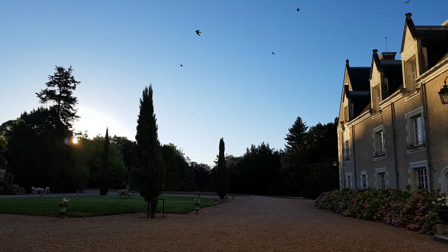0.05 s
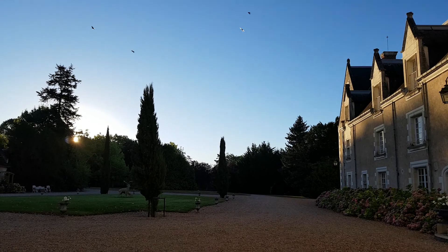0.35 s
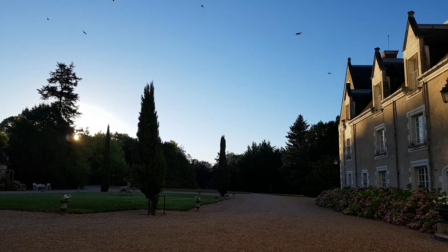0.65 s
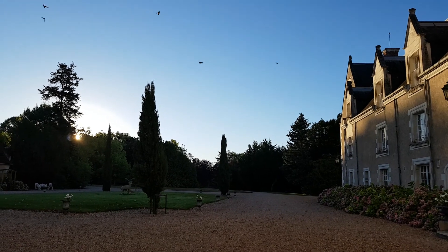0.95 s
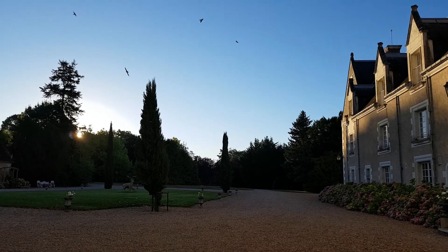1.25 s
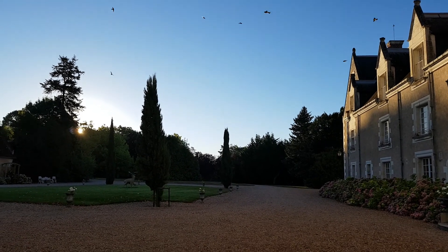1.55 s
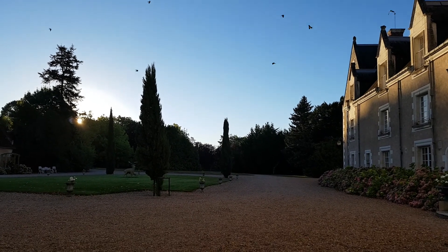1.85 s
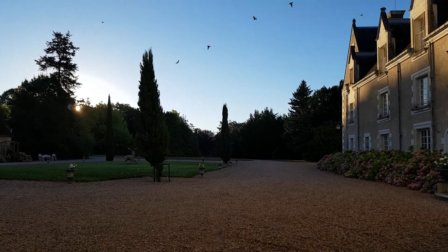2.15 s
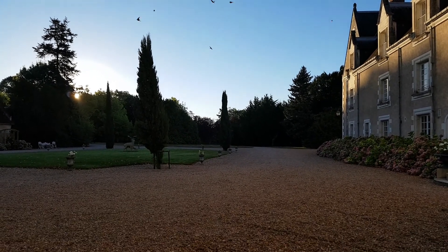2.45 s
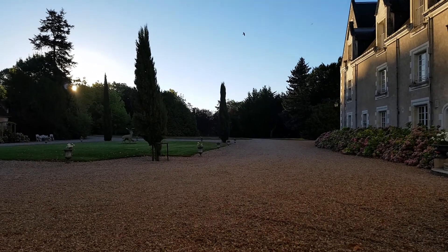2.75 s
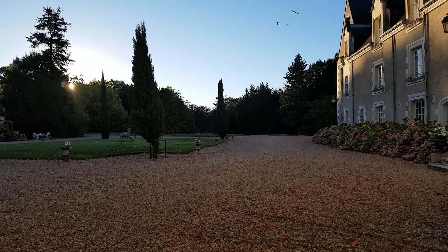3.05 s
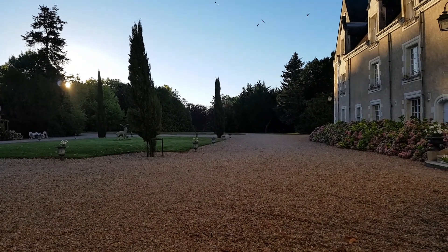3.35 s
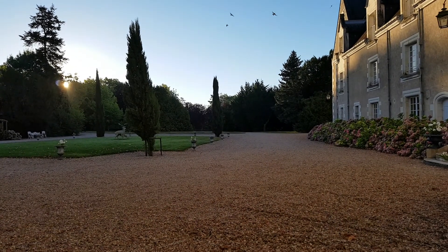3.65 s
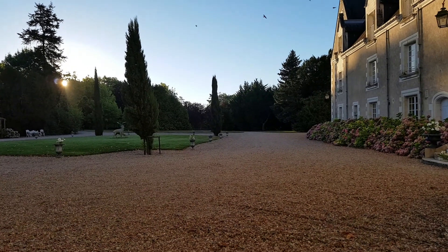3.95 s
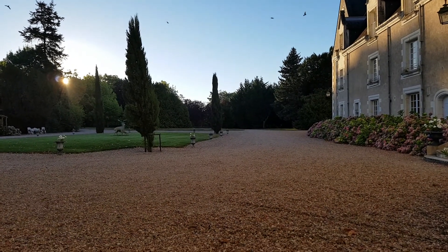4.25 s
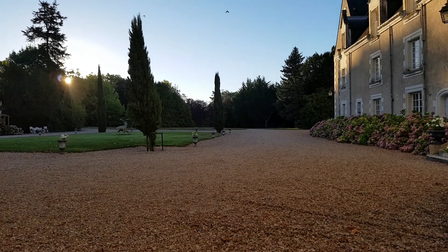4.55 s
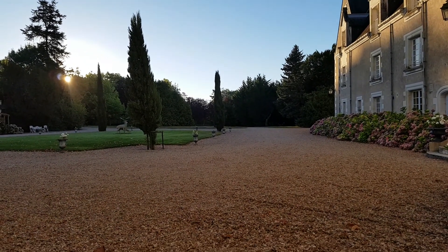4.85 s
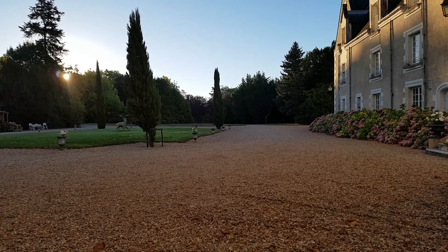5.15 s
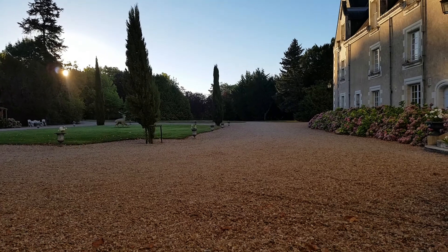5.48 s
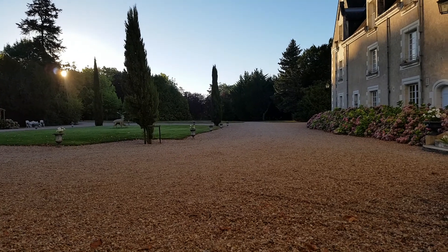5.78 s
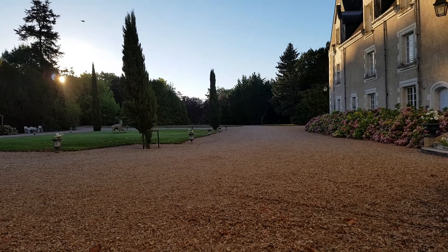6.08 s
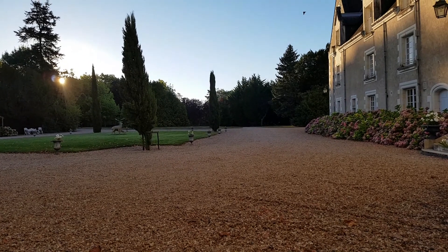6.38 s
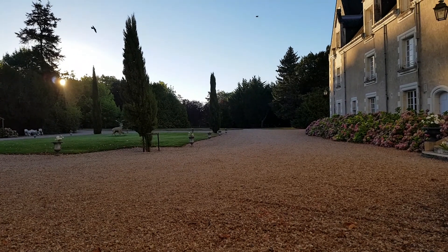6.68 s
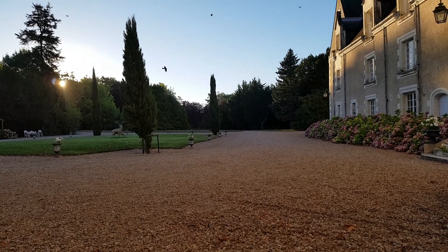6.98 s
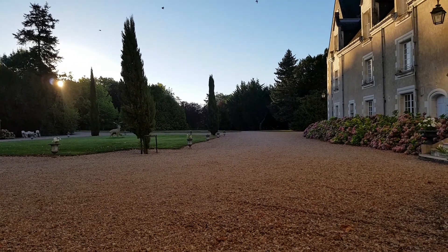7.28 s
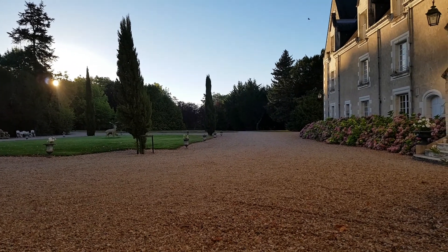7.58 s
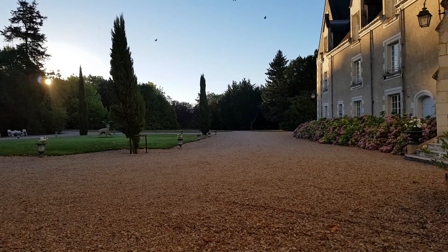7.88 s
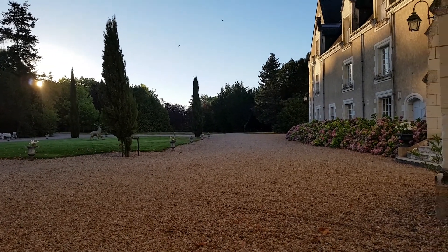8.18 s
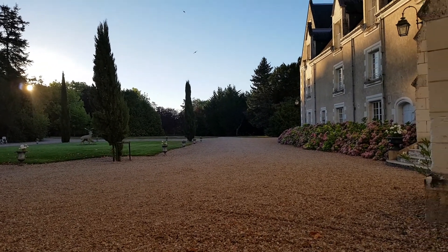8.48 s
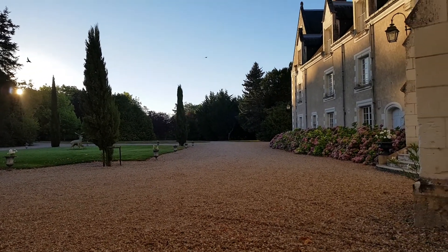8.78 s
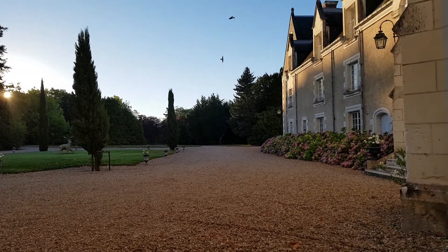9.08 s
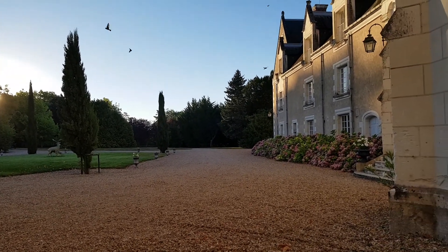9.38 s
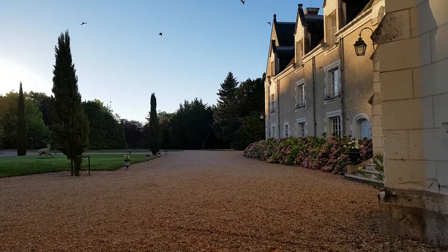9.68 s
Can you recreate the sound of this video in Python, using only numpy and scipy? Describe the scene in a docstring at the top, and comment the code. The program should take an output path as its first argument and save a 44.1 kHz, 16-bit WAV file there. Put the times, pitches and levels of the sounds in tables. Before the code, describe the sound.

High chirps, raspy buzzes and swooping alarm whistles from small birds echo around an open courtyard above a low distant hum.

```python
"""Martins wheel over a gravel court beside a stone house, heard in stereo on a still day.
Close to the microphone they give falling, fluttering alarm whistles, arched chirps, buzzy rasps
made of fast upsweeps and a soft low twitter; further off are thin peeps. The gravel scuffs faintly.
The wall and a far tree line throw the calls back, their echo lingers as a shimmer, and distant
traffic hums underneath."""
import sys
import numpy as np
from scipy import signal
from scipy.fft import rfft, irfft, next_fast_len
from scipy.io import wavfile

SR = 44100
rng = np.random.default_rng(int(sys.argv[2]) if len(sys.argv) > 2 else 0)


def store_wav(level_fs):
    """Save 16-bit WAV to argv[1]."""
    pcm = np.round(np.clip(np.atleast_2d(level_fs), -1, 1) * 32767)
    wavfile.write(sys.argv[1], SR, pcm.T.astype(np.int16))


N = 437913
TIME = np.arange(N) / SR


def from_db(db):
    """Decibels to gain."""
    return 10 ** (np.asarray(db) / 20)


def rms_one(x):
    """Scale to unit power."""
    return x / np.sqrt(np.mean(x ** 2) + 1e-20)


def at_hz(points, hz):
    """Read a spectrum table on a log-frequency axis."""
    table = np.array(points)
    return np.interp(np.log(np.maximum(hz, 1)), np.log(table[:, 0]), table[:, 1])


def noise(spectrum, size=N):
    """Noise of a given colour, unit power."""
    padded = next_fast_len(size)
    colour = from_db(at_hz(spectrum, np.fft.rfftfreq(padded, 1 / SR)))
    return rms_one(irfft(rfft(rng.standard_normal(padded)) * colour, padded)[:size])


def wander(t, per_s):
    """Smooth chance that takes a new value per_s times a second."""
    knots = rng.standard_normal(2048)
    return np.interp((t - t[0]) * per_s, np.arange(len(knots)), knots)


def span(start, length):
    """The sample times of one call."""
    return TIME[int(start * SR):][:max(int(length * SR), 32)]


def fades(t, edge_s):
    """Soft start and end."""
    return np.sin(np.pi / 2 * np.clip(np.minimum(t - t[0], t[-1] - t) / edge_s, 0, 1)) ** 2


def envelope(t, attack_s, release_s=.025):
    """Straight attack, hold, straight release."""
    return np.minimum((t - t[0]) / attack_s, 1) * np.minimum((t[-1] - t) / release_s, 1)


def phase_of(hz):
    """Running phase of a moving pitch."""
    return 2 * np.pi * np.cumsum(hz) / SR


def add(out, t, sound, pan_db, send_db=0, lag_s=0):
    """Place a sound in stereo: out[0] goes straight to the microphone, out[1] to the walls."""
    sides, send = rms_one(from_db([pan_db / 2, -pan_db / 2])), from_db(send_db)
    for channel, at in enumerate([round(t[0] * SR), round((t[0] + lag_s) * SR)]):
        placed = sound * sides[channel] / np.sqrt(1 + send ** 2 / 2)
        out[0, channel, at:at + len(t)] += placed
        out[1, channel, at:at + len(t)] += placed * send


# Distant traffic and open air. Each row: frequency in Hz, relative level in dB.
AIR_SPECTRUM = [(20, -6.5), (35, -8), (50, -0.5), (67, 1.5), (105, -6), (140, -0.5), (180, -4), (300, -12),
                (600, -16), (1500, -20), (3000, -21.5), (7500, -32.5), (10000, -33.5), (15500, -28.5)]
# The background's rise and fall. Each row: time in seconds, level in dB before gain_db.
AIR_LEVEL = [(0.0, -64.5), (4.12, -61.5), (4.17, -63), (9.29, -65), (9.37, -62), (9.93, -65)]
# Its width at the microphone. Each row: frequency in Hz, left-right likeness from 0 to 1.
AIR_LIKENESS = [(30, 0.88), (140, 0.87), (350, 0.44), (700, 0.24), (2000, 0), (8000, 0)]


def open_air(gain_db=2.5, pan_db=-1.5):
    """Far traffic hums almost alike in both channels, under a thin, wide hiss."""
    size = next_fast_len(N)
    hz = np.fft.rfftfreq(size, 1 / SR)
    alike = at_hz(AIR_LIKENESS, hz)
    mid, side = rfft(rng.standard_normal((2, size)))
    pair = np.sqrt(1 + alike) * mid + np.sqrt(1 - alike) * side * [[1], [-1]]
    pair *= from_db(at_hz(AIR_SPECTRUM, hz) + pan_db / 2 * alike * [[1], [-1]])
    level_db = gain_db + np.interp(TIME, *np.transpose(AIR_LEVEL))
    return rms_one(irfft(pair, size)[:, :N]) * from_db(level_db)


# The calls' echo hanging over the court. Each row: time in seconds, centre pitch in Hz, level in dB.
LINGERING_ECHO = [(0, 4450, -68), (.78, 4460, -72.5), (0.952, 4880, -61.5), (1.299, 4240, -66.5),
                  (1.7, 3901, -62.5), (2.25, 4190, -87), (2.5, 4620, -66.5), (4.199, 4485, -64),
                  (4.801, 3644, -71.5), (5.55, 3880, -83.5), (6.099, 3765, -68), (6.45, 3845, -62.5),
                  (6.998, 4740, -66.5), (7.548, 4360, -125), (7.95, 4340, -65.5), (8.5, 4646, -65.5),
                  (9.15, 4228, -87.5), (9.93, 4170, -69)]


def lingering_echo(width_hz=480, flicker_db=2, buzz_db=2, pan_db=-3):
    """The calls ring on in a shimmering band of noise whose pitch drifts."""
    times, hz, db = np.transpose(LINGERING_ECHO)
    lowpass = signal.butter(2, width_hz, fs=SR, output="sos")
    blur = signal.sosfilt(lowpass, rng.standard_normal((2, 2, N)))
    band = np.real((blur[0] + 1j * blur[1]) * np.exp(1j * phase_of(np.interp(TIME, times, hz))))
    level_db = np.interp(TIME, times, db) + flicker_db * wander(TIME, 22) + buzz_db * wander(TIME, 110)
    return rms_one(band * from_db([[pan_db / 2], [-pan_db / 2]])) * from_db(level_db)


# Short buzzy sounds: rasps, and two alarm echoes thrown back from the trees (at 7.091 and 9.817 s).
# Each row: start in seconds, length in seconds, level in dB.
BUZZES = [ (0.138, 0.1, -54), (.227, 0.14, -59.5), (0.41, 0.036, -51), (0.703, .051, -66.5),
          (0.8, 0.091, -53), (2.604, .087, -47.5), (2.715, 0.086, -46.5), (2.868, 0.084, -44.5),
          (2.986, 0.077, -44.5), (3.169, .093, -52.5), (3.293, 0.057, -54.5), (3.475, 0.11, -50.5),
          (3.647, 0.052, -54), (3.805, 0.1, -58.5), (3.914, 0.2, -59), (4.046, 0.051, -49.5),
          (4.185, .13, -64.5), (4.402, 0.25, -57.5), (5.791, 0.13, -65), (5.978, 0.076, -48.5),
          (6.973, 0.054, -62), (7.091, 0.052, -61), (7.89, 0.11, -64.5), (8.057, .1, -61),
          (8.166, 0.11, -50), (8.281, 0.1, -49.5), (8.661, 0.072, -64), (9.817, 0.085, -62), ]
# A far bird repeats a rasp at an even pace. Each row: start and latest repeat in seconds,
# starting pitch in Hz, level in dB, left over right in dB.
FAR_BOUTS = [(4.603, 5.7, 1755, -65.5, -2), (7.354, 7.7, 2204, -70.5, -5)]


def buzzes(from_hz=2440, single_pan_db=-3.5, pace_s=.243, bout_rasp_s=.095):
    """List the single buzzy sounds, then every rasp in the far bouts."""
    calls = [(start, length, from_hz, db, single_pan_db) for start, length, db in BUZZES]
    for start, end, hz, db, pan_db in FAR_BOUTS:
        count = int((end - start) / pace_s) + 1
        calls += [(start + k * pace_s, bout_rasp_s, hz, db, pan_db) for k in range(count)]
    return calls


# How throat and beak pass a rasp's partials. Each row: frequency in Hz, gain in dB.
BEAK_RESPONSE = [(1500, 4.5), (2400, 0), (3300, -2.5), (4100, 0.5), (4700, -2), (5300, 1), (6500, -15.5),
                 (9000, -15), (13000, -19), (16000, -10)]
# The hiss in a rasp. Each row: frequency in Hz, relative level in dB.
RASP_HISS = [(1000, -3.5), (2400, -4), (4700, 11.5), (5500, -9), (6800, -13), (12000, -1), (15000, -11),
             (16000, -30)]


def rasps(sweep_s=.0215, rise_share=.62, top_ratio=2.25, waver=.11, rough=.085, hiss_db=-8,
          swell_db=5, uneven_db=-1.5, ring_hz=4850, near_db=-46):
    """Both sides of the syrinx shoot rough upsweeps through the beak, which rings on.
    The two alarm echoes from the trees get the same buzz."""
    out, hiss = np.zeros((2, 2, N)), noise(RASP_HISS)
    beak_ring = signal.iirpeak(ring_hz, Q=9, fs=SR)
    for start, length, low_hz, db, pan_db in buzzes():
        t = span(start, length)
        age = t - t[0]
        sweeps = age / sweep_s + .1 * wander(t, 45) * np.minimum(age / .02, 1)
        rise = np.minimum(sweeps % 1 / rise_share, 1)
        tone = 0
        for _ in range(2):   # each side wavers on its own
            pitch = low_hz * (1 + (top_ratio - 1) * rise ** 1.4) * (1 + waver * wander(t, 300))
            phase = phase_of(pitch * (1 + rough * wander(t, 2200)))
            for k in range(1, 5):
                gain = from_db(at_hz(BEAK_RESPONSE, k * pitch)) / np.sqrt(k)
                tone += gain * np.sin(k * phase) * (k * pitch < SR / 2)
        pulses = .25 + .75 * np.abs(np.sin(np.pi * rise ** 1.2)) ** .5
        swell = from_db(swell_db * np.sin(np.pi * age / length) + uneven_db * wander(t, 110))
        breath = from_db(hiss_db) * hiss[round(t[0] * SR):][:len(t)]
        voice = (rms_one(tone) + breath) * pulses * swell
        voice += from_db(2) * signal.lfilter(*beak_ring, voice)
        send_db = np.clip(.98 * (near_db - db), 2, 10)   # faint ones are far off, with more echo
        add(out, t, from_db(db) * rms_one(voice * fades(t, .00044)), pan_db, send_db, lag_s=.00003)
    return out


# A whistling throat favours one pitch. Each row: frequency in Hz, gain in dB.
WHISTLE_THROAT = [(3000, -2), (4250, 2), (4850, 4), (5450, -6.5), (6500, -8), (7500, -3)]
# The hiss above a whistle. Each row: frequency in Hz, relative level in dB.
WHISTLE_HISS = [(2000, -40), (5000, 10), (7300, 12), (8800, 18), (12000, 8), (16000, -25)]


def whistle(t, glide_hz, flick_at, flick_s, flick_hz, hoarse, accent_db=-1, sharpness=3.1, build_s=.068):
    """Quick upward flicks grow on a gliding tone; returns it and its edge of overtones and hiss."""
    flick = np.abs(np.cos(np.pi * (t - flick_at) / flick_s)) ** (2 * sharpness)
    flick *= np.minimum((t - t[0]) / build_s, 1)
    pitch = glide_hz + flick_hz * flick * (1 + .15 * wander(t, 45))   # flicks vary in height
    phase = phase_of(pitch * (1 + hoarse * wander(t, 915)))
    overtones = (np.sin(2 * phase) + from_db(-1) * np.sin(3 * phase)) * (1 - flick / 2)
    tone = rms_one(np.sin(phase)) * from_db(at_hz(WHISTLE_THROAT, pitch) + accent_db * flick)
    return tone, rms_one(overtones) + from_db(-4) * noise(WHISTLE_HISS, len(t))


# Contact chirps over the court. Each row: start and length in seconds, top of the arch in Hz,
# base level in dB, left over right in dB.
CHIRPS = [(1.456, .185, 3660, -49, -6), (3.559, .11, 3436, -48, -5.5), (4.499, 0.098, 3720, -50, -7),
          (5.882, 0.11, 3630, -49.5, -5.5), (8.834, 0.11, 3750, -52, -4)]


def chirps(rise_share=.35, edge_db=-25.5):
    """A hoarse whistle swells as it shoots up to its top pitch, then sinks back."""
    out = np.zeros((2, 2, N))
    for start, length, top_hz, db, pan_db in CHIRPS:
        t = span(start, length)
        arch_hz = top_hz * np.interp((t - start) / length, [0, rise_share, 1], [.61, 1, .8])
        tone, edge = whistle(t, arch_hz, start, flick_s=.018, flick_hz=560, hoarse=.055)
        effort = from_db(db) * envelope(t, rise_share * length)
        add(out, t, (tone + from_db(edge_db) * edge) * effort, pan_db, send_db=2, lag_s=-.00005)
    return out


# Alarms close to the microphone. Each row: start and length in seconds, first and last glide pitch
# in Hz, base level in dB, attack in seconds, level change over the call in dB, moment of one flick
# in seconds, flick height in Hz, then flick accent, edge level, echo send and left over right,
# all in dB, and right-channel lag in seconds.
ALARMS = [ (1.764, 0.11, 5920, 3240, -41, 0.0033, 1.5, 2, 660, 1, -12.5, -0.5, -7, .00023),
          (1.913, 0.22, 6650, 2750, -40.5, 0.018, -13, 2.012, 754, 1.5, -22.5, -1.5, -8.5, .00025),
          (6.525, .23, 6800, 2723, -33.5, 0.063, -17, 6, 1172, 3.5, -19.5, 0, -3, -.0002),
          (9.31, 0.23, 7020, 2967, -27, 0.032, -8, 10.6, 1282, -1.5, -27, -4, -8, .00021), ]


def alarms(bend=.85, flick_s=.0224, hoarse=.0184):
    """Each whistle flutters down about an octave, steepest at first; most weaken on the way."""
    out = np.zeros((2, 2, N))
    for (start, length, first_hz, last_hz, db, attack_s, change_db,
         flick_at, flick_hz, accent_db, edge_db, send_db, pan_db, lag_s) in ALARMS:
        t = span(start, length)
        progress = np.linspace(0, 1, len(t))
        glide_hz = first_hz * (last_hz / first_hz) ** (progress ** bend)
        tone, edge = whistle(t, glide_hz, flick_at, flick_s, flick_hz, hoarse, accent_db)
        effort = from_db(db + change_db * progress) * envelope(t, attack_s)
        add(out, t, tone * effort, pan_db, send_db, lag_s)
        add(out, t, from_db(edge_db) * edge * effort, 0, send_db, lag_s)   # equally loud on both sides
    return out


# Upslurs of the twitter in the court. Each row: start in seconds, middle pitch in Hz, level in dB.
TWITTER_SLURS = [(2.853, 1477, -47.5), (3.036, 1703, -53), (3.108, 1500, -53), (3.221, 1222, -56.5),
                 (3.238, 1900, -55), (3.298, 1156, -60), (3.333, 1336, -57.5), (3.941, 1310, -57.5)]
# Its held notes. Each row: start and length in seconds, middle pitch in Hz, level in dB.
TWITTER_NOTES = [(2.94, .05, 1020, -62), (3.079, 0.045, 1140, -59.5), (3.125, 0.031, 2980, -53),
                 (3.355, 0.052, 1480, -53), (3.388, 0.0643, 1580, -48), (3.611, 0.049, 3720, -50.5),
                 (3.645, 0.049, 1586, -48), (3.956, 0.095, 1582, -62)]


def twitter_notes(slur_s=.0224, rise_octaves=.55, arch_octaves=.122,
                  babble_from_s=2.89, babble_to_s=3.92, babble_hz=1160, babble_count=18):
    """List the slurs, the held notes and the soft babble that joins them up."""
    notes = [(start, slur_s, hz, db, rise_octaves, 0) for start, hz, db in TWITTER_SLURS]
    notes += [(*note, 0, arch_octaves) for note in TWITTER_NOTES]
    for k in range(babble_count):
        progress = (k + rng.random()) / babble_count
        start = babble_from_s + progress * (babble_to_s - babble_from_s)
        db = -64 - 2 * progress
        hz = babble_hz * 2 ** (.099 * rng.standard_normal())
        if k % 2:   # a slur so short that it ticks
            notes.append((start, .0123, hz * 2 ** (rise_octaves / 2), db, rise_octaves, 0))
        else:   # a low, dipping note
            notes.append((start, .036, hz, db, 0, -arch_octaves))
    return notes


def twitter(partials_db=(0, -9, -20)):
    """Short low slurs and arched notes, reedy and scratchy, just right of centre."""
    out = np.zeros((2, 2, N))
    for start, length, hz, db, rise, arch in twitter_notes():
        t = span(start, length)
        along = np.linspace(-1, 1, len(t))
        pitch = hz * 2 ** (rise * along / 2 - arch * along ** 2)
        phase = phase_of(pitch * (1 + .06 * wander(t, 900)))
        tone = sum(from_db(level) * np.sin(k * phase) * (k * hz < 5500)
                   for k, level in enumerate(partials_db, 1))
        scratch = from_db(4.1 * wander(t, 305))
        add(out, t, from_db(db) * rms_one(tone * scratch * fades(t, .21 * length)), pan_db=-2)
    return out


# Birds further off. Each row: start and length in seconds, first pitch in Hz, base level in dB.
PEEPS = [(3.309, .08, 5100, -61), (4.203, .1, 7560, -60.5), (4.353, .15, 8500, -60.5),
         (4.758, 0.059, 6650, -54), (6.284, 0.13, 4970, -66)]


def peeps(octaves_per_s=-1.6):
    """Thin, high whistles sink a little and reach the microphone mostly as echo."""
    out = np.zeros((2, 2, N))
    for start, length, first_hz, db in PEEPS:
        t = span(start, length)
        glide_hz = first_hz * 2 ** (octaves_per_s * (t - start))
        tone, _ = whistle(t, glide_hz, start, flick_s=.02, flick_hz=452, hoarse=.105)
        add(out, t, from_db(db) * tone * fades(t, .017), pan_db=-3, send_db=14)
    return out


# Faint scuffs on the gravel of the court. Each row: start and length in seconds, level in dB.
SCUFFS = [(4.099, 0.0081, -60.5), (4.893, 0.066, -72), (5.051, 0.1, -77), (5.348, 0.094, -72.5),
          (8.558, 0.22, -69.5)]
# The colour of the grit. Each row: frequency in Hz, relative level in dB.
GRAVEL_SPECTRUM = [(150, -23), (400, 8), (900, 3), (1700, 6.5), (3000, -3), (15000, -59)]


def gravel_scuffs():
    """Loose stones rub softly, centred between the channels."""
    out, grit = np.zeros((2, 2, N)), noise(GRAVEL_SPECTRUM)
    for start, length, db in SCUFFS:
        t = span(start, length)
        rub = grit[round(t[0] * SR):][:len(t)] * from_db(5.5 * wander(t, 168.5))
        add(out, t, from_db(db) * rms_one(rub * fades(t, length / 2)), pan_db=0)
    return out


# Ground, wall and eaves near the microphone. Each row: typical echo delay in seconds, gain in dB.
EARLY_ECHOES = [(.0038, -7), (.0085, -11), (.0145, -15)]


def courtyard(paths, facade_t60=.27, tail_t60=.71, trees_s=.51, trees_spread_s=.033):
    """Early echoes, scatter from the facade, a thin open-air tail and a late blur from the trees."""
    direct, sent = paths
    t = TIME[:SR]
    facade = from_db(-60 * t / facade_t60) * (t > .002)
    tail = from_db(-60 * t / tail_t60) * (t > .02)
    late = np.maximum(t - trees_s, 0) / trees_spread_s
    trees = late * np.exp(-late)
    dulling = signal.butter(2, 7000, fs=SR, output="sos")   # air and leaves dull the scatter
    echoes = []
    for channel in sent:
        scatter = sum(from_db(db) * rms_one(shape * rng.standard_normal(SR)) / np.sqrt(SR)
                      for db, shape in [(-7, facade), (-17, tail), (-28, trees)])
        response = signal.sosfilt(dulling, scatter)
        for delay, db in EARLY_ECHOES:
            response[int(delay * rng.uniform(.93, 1.07) * SR)] += from_db(db)
        echoes.append(signal.fftconvolve(channel, response)[:N])
    return direct + np.array(echoes)


def scene():
    """From a spot in the court: birds and scuffs with their echoes, over the far background."""
    birds = alarms() + chirps() + peeps() + rasps() + twitter()
    return courtyard(birds + gravel_scuffs()) + lingering_echo() + open_air()


def record(dry):
    """The microphone's signal is cut steeply above 15850 Hz."""
    return signal.sosfilt(signal.ellip(10, .1, 70, 15850, fs=SR, output="sos"), dry)


dry = scene()
out = record(dry)
store_wav(out)
```